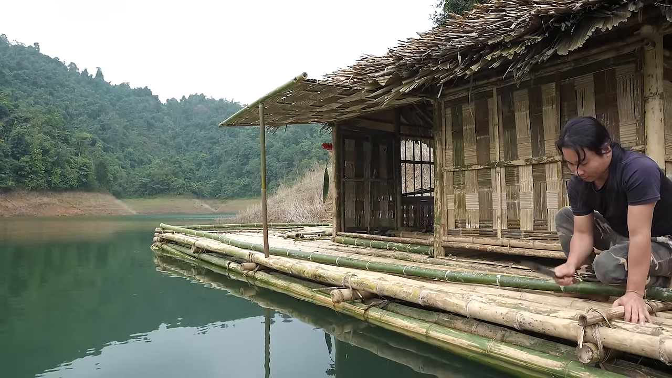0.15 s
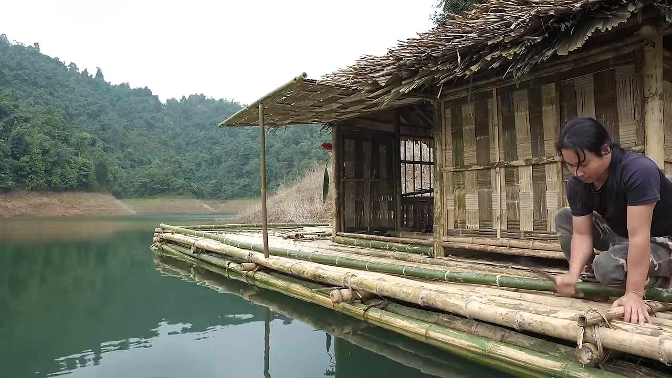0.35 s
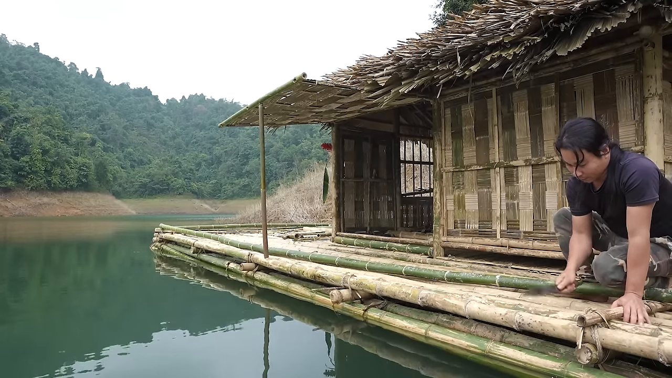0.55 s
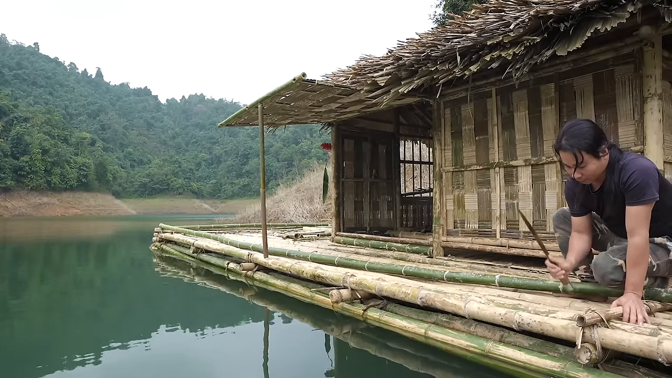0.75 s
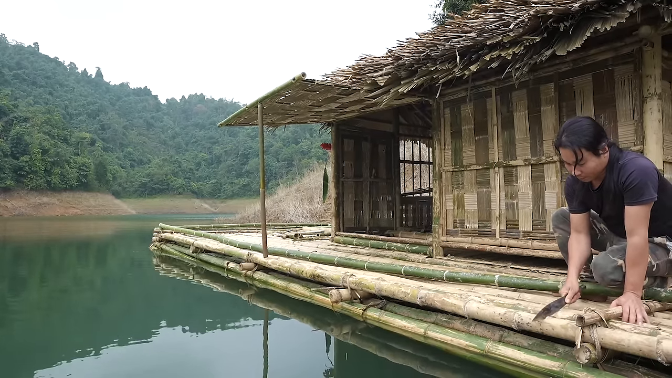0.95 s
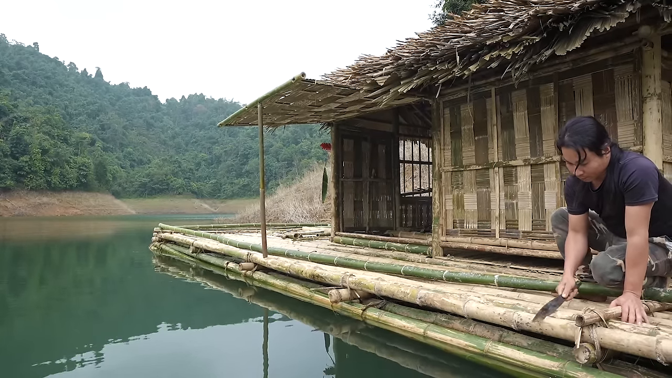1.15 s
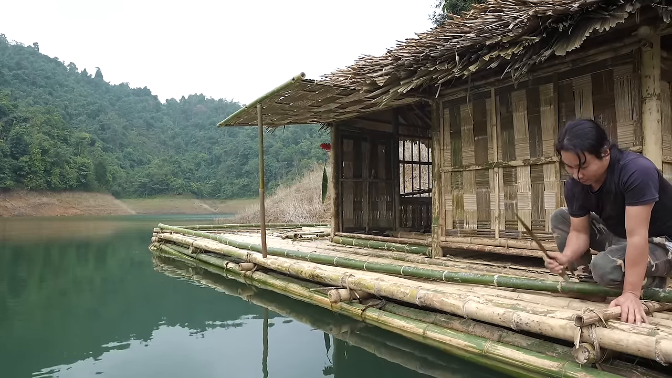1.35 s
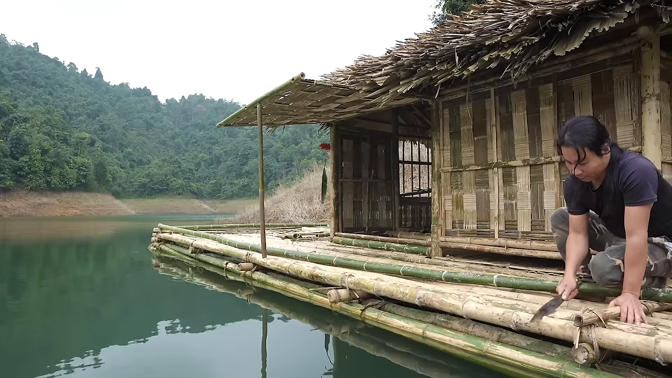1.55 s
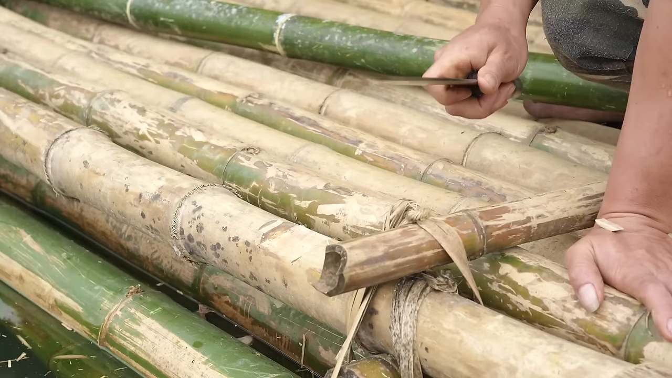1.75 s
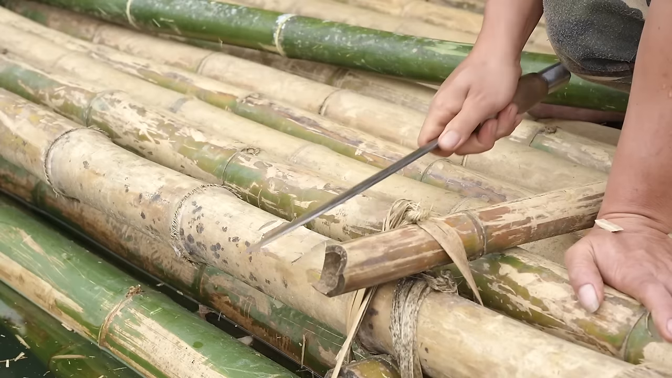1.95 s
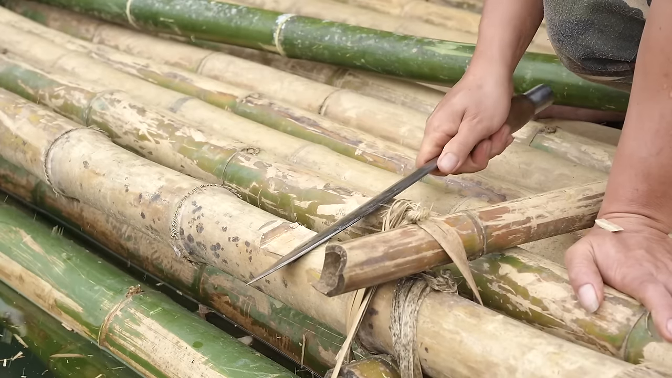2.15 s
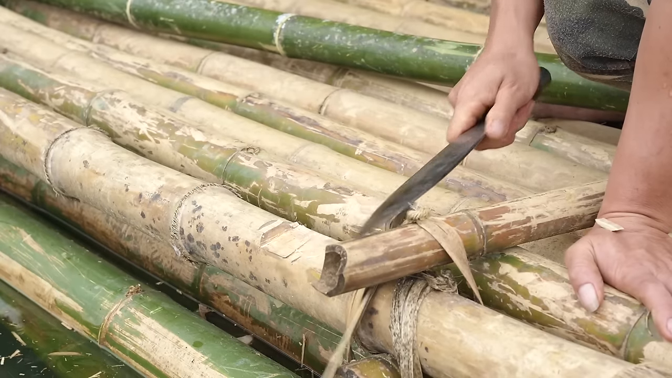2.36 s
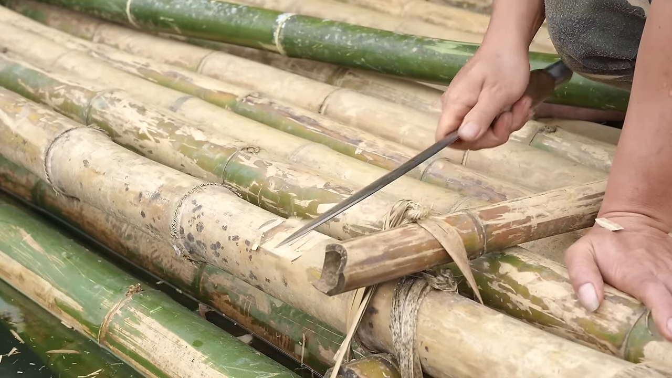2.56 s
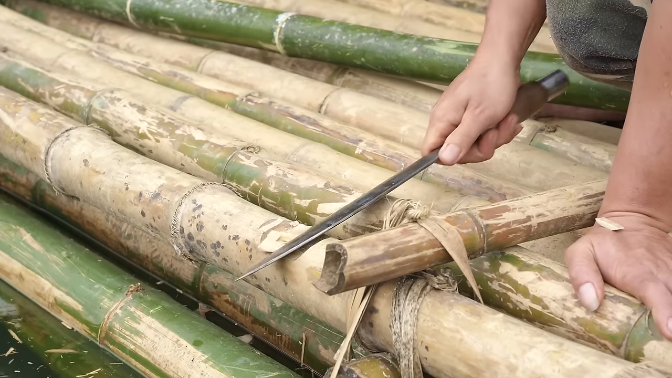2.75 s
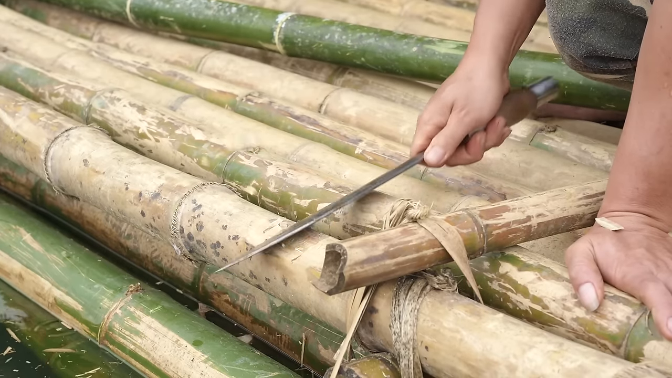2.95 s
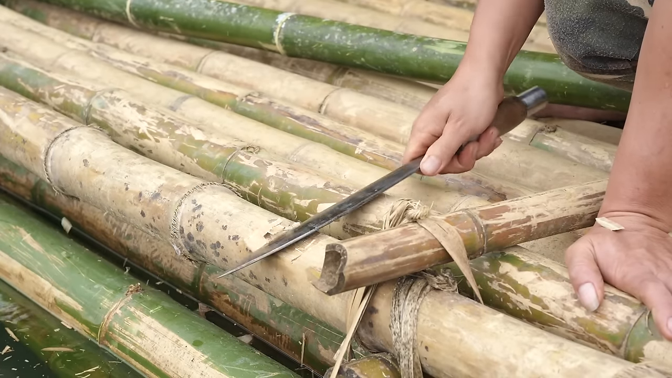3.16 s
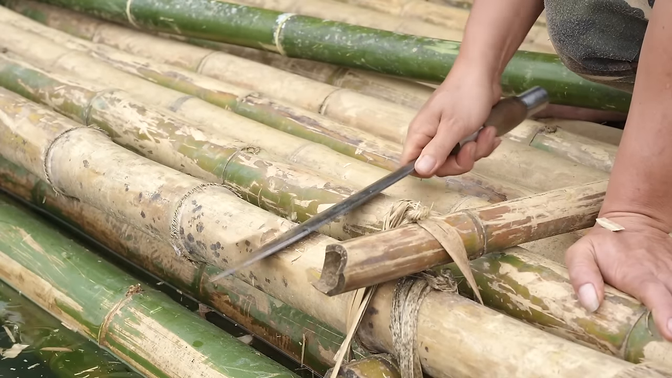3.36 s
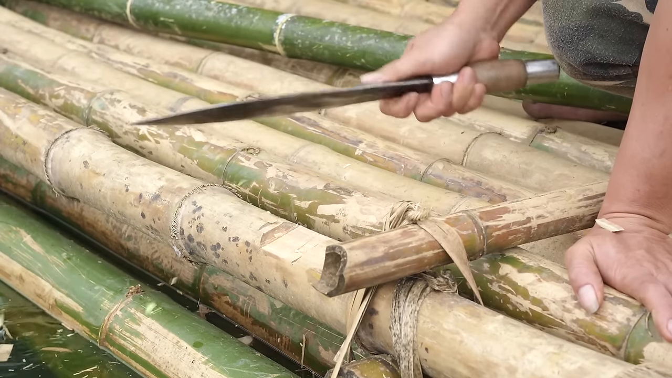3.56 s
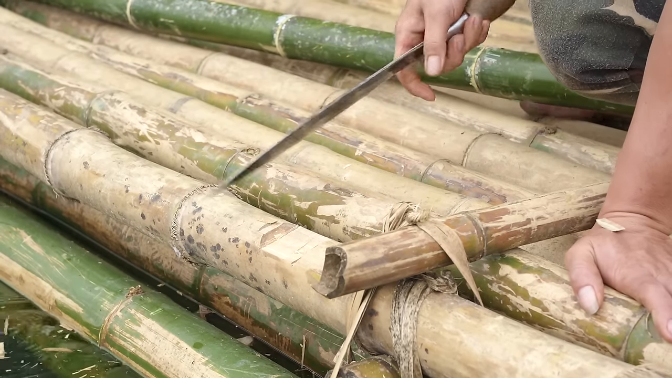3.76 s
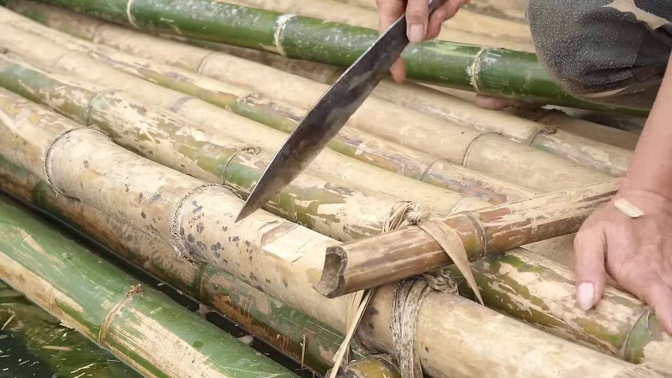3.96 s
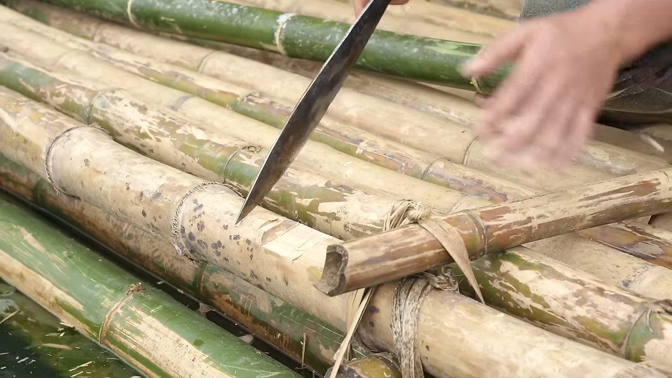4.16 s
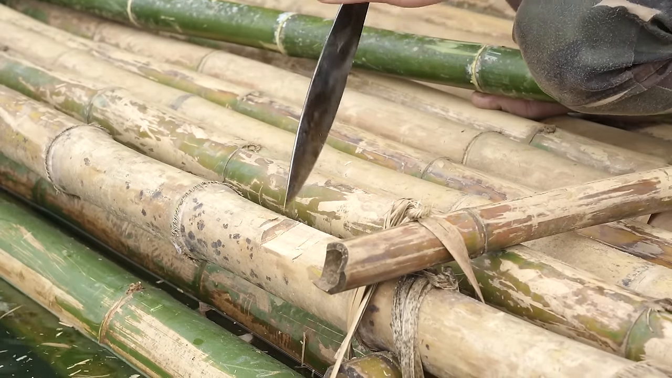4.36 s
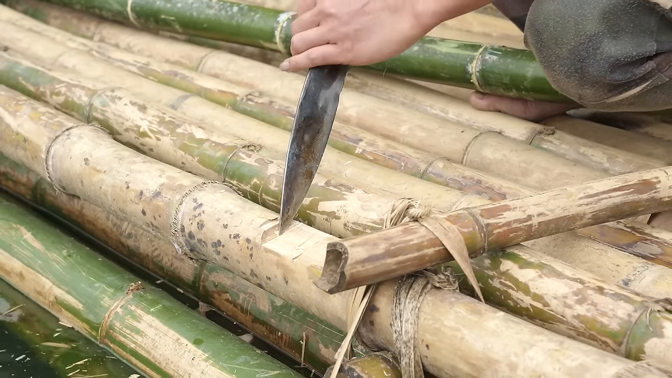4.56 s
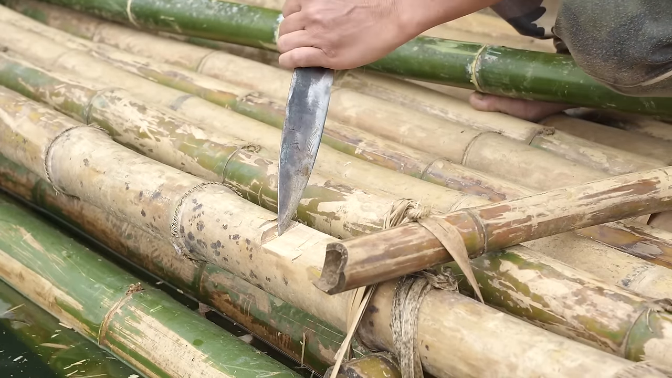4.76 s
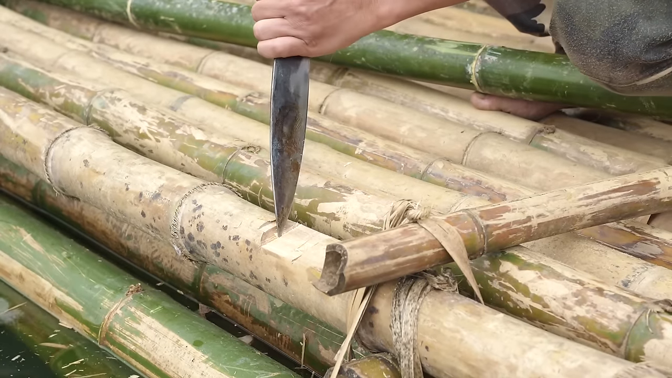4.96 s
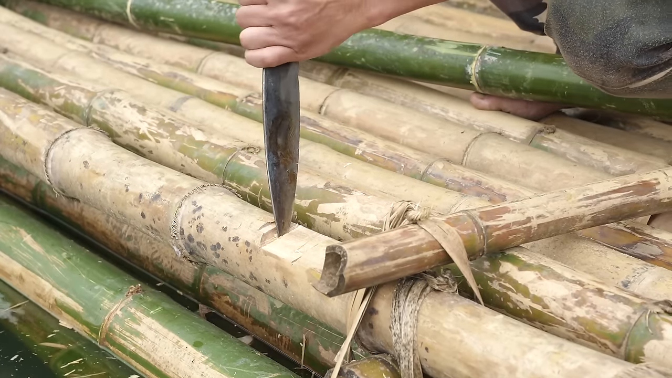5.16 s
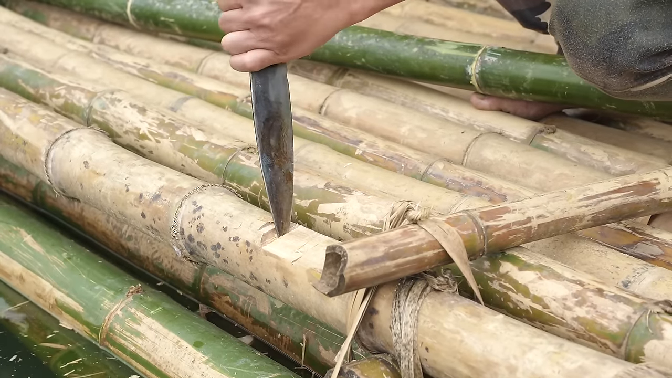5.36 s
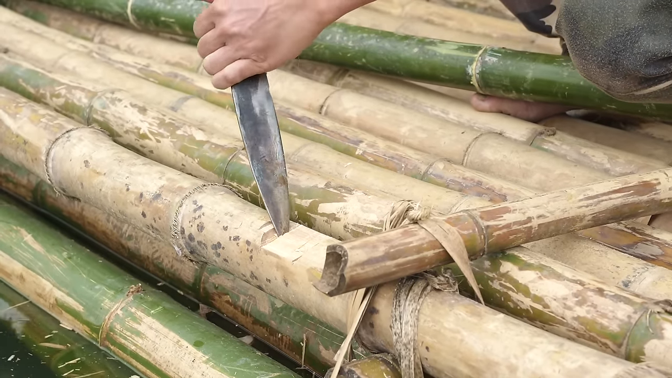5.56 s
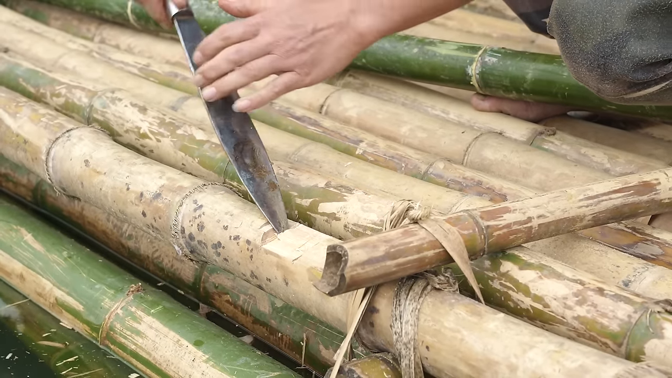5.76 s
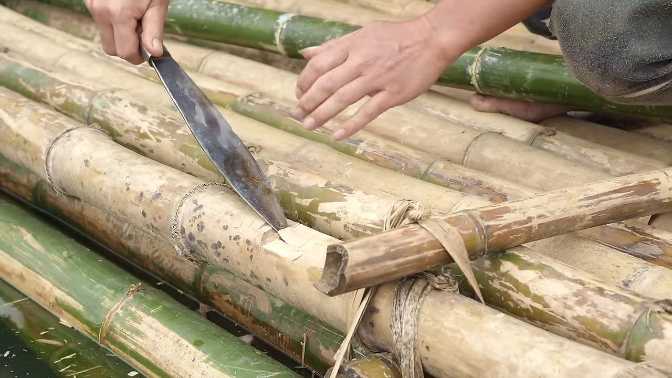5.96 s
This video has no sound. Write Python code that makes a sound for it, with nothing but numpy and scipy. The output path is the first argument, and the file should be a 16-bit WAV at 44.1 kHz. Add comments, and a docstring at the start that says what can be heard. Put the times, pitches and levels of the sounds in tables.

```python
"""Knife notching bamboo on a raft

A large knife cuts a notch in a bamboo pole lashed to a raft: five full swings and quick slanting cuts.
Each blow cracks the cane (noise tears through its wall modes) and thuds through the hollow deck poles
(modes and a blur of noise, low notes last). Then the knife tip is turned in the notch: coloured noise
makes small ticks, scrapes, slides and rustles, short sines ring the steel; faint air, wind and tails around.
"""
import sys
import numpy as np
from scipy import signal
from scipy.fft import rfft, irfft
from scipy.io import wavfile
from scipy.ndimage import uniform_filter1d

SR = 44100
rng = np.random.default_rng(int(sys.argv[2]) if len(sys.argv) > 2 else 0)


def wav_record(signal):
    """Record a signal, one row per channel, as 16-bit PCM in the file named by sys.argv[1]."""
    frames = np.transpose(np.atleast_2d(signal))
    bounded = np.clip(frames, -1, 1)
    # unit amplitude maps onto the largest positive 16-bit level
    quanta = np.round(bounded * 32767).astype(np.int16)
    wavfile.write(sys.argv[1], SR, quanta)


N = 265041
T = np.arange(SR // 2) / SR  # time axis of one event, s

# slanting cuts: t/s, crack/dB, hollow knock/dB, splinter fizz/dB, deck thud/dB, # bite decay/s, hollow
# pitch/Hz, deck's favoured note/Hz
CUTS = [(1.9256, -15.5, -18.5, -23.5, -16, 0.0024, 798, 760), (2.2045, -18, -18, -24, -16, 0.004, 966, 280),
        (2.4376, -18, -26, -17.5, -16.5, 0.0079, 1027, 440),
        (2.4822, -15.5, -23.5, -18.5, -15.5, 0.0022, 942, 660),
        (2.7228, -13.5, -23, -21, -15.5, 0.012, 798, 292),
        (2.959, -17.5, -19, -30.5, -25, .0013, 1064, 456),
        (2.9666, -17.5, -22, -22, -12.5, 0.0069, 785, 483),
        (3.1756, -14, -23.5, -20.5, -15.5, 0.014, 1290, 275),
        (3.4, -14, -27.5, -23.5, -21, 0.004, 1330, 640), (3.432, -15, -24, -25, -15.5, 0.002, 773, 520),
        (3.8864, -23.5, -17.5, -26.5, -19, 0.0066, 693, 438),
        (3.938, -35, -29.5, -48.5, -37, 0.0053, 623, 445)]
# colour of small snaps: f/Hz, level/(dB per Hz)
TICK = [(200, -18.5), (1200, -15.5), (2600, -5), (3600, -2.5), (5000, -8), (7500, -5.5), (10000, -5.5),
        (14000, -9.5), (16000, -18)]


def amp(db):
    """Amplitude ratio from decibels."""
    return 10 ** (np.asarray(db) / 20)


def evened(x):
    """Scales to unit RMS."""
    return x / np.sqrt(np.mean(x ** 2) + 1e-20)


def sized(x):
    """Scales to the energy of 10 ms at full level."""
    return x / np.sqrt(np.sum(x ** 2) / (SR / 100) + 1e-20)


def dying(t, t60):
    """Exponential decay from t = 0, 60 dB down after t60 seconds; silent before."""
    return np.exp(-np.log(1000) * np.maximum(t, 0) / t60) * (t >= 0)


def read(points, hz):
    """Interpolates a spectrum in dB over log frequency."""
    f, db = np.transpose(points)
    return np.interp(np.log(hz + 1), np.log(f + 1), db)


def add(mix, s, sound):
    """Adds a sound to the mix at s seconds."""
    part = mix[max(round(s * SR), 0):][:len(sound)]
    part += sound[:len(part)]


def colour(x, points, size=4096):
    """Causal minimum-phase filter with the given spectrum."""
    log_gain = np.log(amp(read(points, abs(np.fft.fftfreq(size, 1 / SR)))))
    taps = np.fft.ifft(np.exp(np.conj(signal.hilbert(log_gain)))).real
    return signal.oaconvolve(x, taps[:size // 2])[:len(x)]


def fibres(decay_s, grain_db):
    """Fibres snapping: tiny clicks of uneven size that die away."""
    clicks = rng.standard_normal(len(T)) * amp(grain_db * rng.standard_normal(len(T)))
    return clicks * np.exp(-T / max(decay_s, 1e-4))


def ring(modes, t60):
    """Modes struck together, neighbours in opposite sign."""
    tones = sum((-1) ** k * amp(db) * np.sin(2 * np.pi * hz * T) for k, (hz, db) in enumerate(modes))
    return tones * dying(T, t60)


def outdoors():
    """Faint air over the lake and a low rumble of wind in small gusts."""
    # air colour: f/Hz, level/(dB per Hz)
    air_colour = [(15, -44), (25, -2.5), (64, -15.5), (200, -17.5), (309, -14), (451, -14.5), (714, -18.5),
                  (1130, -21.5), (1370, -20), (1480, -24.5), (2760, -25.5), (3620, -22.5), (5430, -34.5),
                  (14800, -44.5), (16000, -52)]
    # wind level, dropping and picking up again: t/s, level/dB
    wind_level = [(0, -55), (1.0, -50), (1.7, -62), (2.4, -52.5), (4.6, -69.5), (5.4, -57.5), (6.0, -58.5)]
    wind_colour = [(12, -6.0), (28, -1.5), (45, -12.5), (62, 2.0), (80, -8.0), (100, -7.5),
                   (200, -21.5), (900, -58.0)]
    gust_db, gust_hz = -1, 3
    hz, t = np.fft.rfftfreq(N, 1 / SR), np.arange(N) / SR

    def noise(gain):
        return evened(irfft(rfft(rng.standard_normal(N)) * gain, N))

    air = noise(amp(read(air_colour, hz)))
    wind = noise(amp(read(wind_colour, hz)))
    gusts = noise(np.exp(-(hz / gust_hz) ** 2))
    wind_db = np.interp(t, *np.transpose(wind_level)) + gust_db * gusts
    return amp(-62.5) * air + amp(wind_db) * wind


def echo(x, spectrum, t60, delay_s):
    """A faint, diffuse tail: convolution with coloured, decaying noise."""
    t = np.arange(SR) / SR
    tail = colour(rng.standard_normal(SR) * dying(t - delay_s, t60), spectrum)
    return signal.fftconvolve(x, tail / np.linalg.norm(tail))[:N]


def plop():
    """A chip plops into the lake: a small bubble whose pitch rises as it nears the surface."""
    # the bubble: t/s, level/dB, f/Hz, rise/(Hz per s)
    s, db, hz, rise = (3.103, -46.5, 950, 40000)
    out = np.zeros(N)
    tone = np.sin(2 * np.pi * (hz + rise * T / 2) * T)
    envelope = np.minimum(T / 0.009, 1) ** 2 * dying(np.maximum(T - .008, 0), t60=.015)
    add(out, s, amp(db) * sized(tone * envelope))
    return out


def rubbing(strokes, spectrum, attack_s, press_db, release_t60, clump_db, catches_per_s, catch_db):
    """Friction sets in, grows as the pressure builds and lets go; clumps of hiss and tiny catches."""
    level = np.zeros(N)
    for s, length_s, db in strokes:
        pressure = amp(press_db * np.minimum(T / length_s - 1, 0))
        release = dying(np.maximum(T - length_s, 0), release_t60)
        add(level, s, amp(db) * np.minimum(T / attack_s, 1) * pressure * release)
    clumps = amp(clump_db * evened(uniform_filter1d(rng.standard_normal(N), 70)))
    catches = (rng.random(N) < catches_per_s / SR) * rng.standard_normal(N)
    grain = evened(rng.standard_normal(N) * clumps) + amp(catch_db) * evened(catches)
    return level * evened(colour(grain, spectrum))


def singing(x, hz, width_hz, db):
    """Whatever the tip touches also rings the blade's strongest mode."""
    return x + amp(db) * signal.lfilter(*signal.iirpeak(hz, hz / width_hz, SR), x)


def bumps():
    """A soft push wakes only the lowest modes of the poles, which beat against each other."""
    # bumps of the knife's tip and of weight shifting on the poles: t/s, level/dB, f/Hz, tap/dB
    pushes = [(2.377, -33.5, 285, -35.5), (4.2397, -23, 276.8, -29.5), (4.551, -40, 271, -53.5),
              (5.401, -38.5, 285, -57.5), (5.513, -47.5, 286, -67.5), (5.584, -50.5, 266, -75),
              (5.921, -62, 318, -43.5)]
    # tap colour: f/Hz, level/(dB per Hz)
    tap_colour = [(100, -8.5), (480, 3), (1000, -0.5), (2400, 2), (4000, -10.5), (16000, -39)]
    blur_colour = [(80, -28), (170, -10.5), (280, -3.5), (500, -7), (900, -10.5), (3000, -35.0), (12000, -57)]
    out = np.zeros(N)
    for s, db, hz, tap_db in pushes:
        modes = sized(ring([(hz * .88, -7), (hz, 0), (hz * 1.14, -3)], t60=0.2))
        blur = sized(colour(rng.standard_normal(len(T)) * dying(T, t60=0.29), blur_colour))
        low = sized((modes + amp(-6.5) * blur) * np.minimum(T / 0.0078, 1))
        tap = sized(colour(fibres(.008, grain_db=4.5), tap_colour))
        add(out, s, amp(db) * low + amp(tap_db) * tap)
    return out


def ticks():
    """Small snaps, each with a brief shiver of the cane and a ring of the blade."""
    # chips snapping and the tip catching in fibres: t/s, level/dB, decay/s, brightness at 13 kHz/dB
    snaps = [(1.247, -41.5, 0.013, -24.5), (2.376, -39, 0.013, -5), (2.382, -36, 0.0055, -14),
             (2.432, -35, 0.017, -2), (2.57, -43.5, .0047, 7), (2.5895, -39, 0.0013, 6.5),
             (2.843, -46, 0.00242, 4), (2.97, -30.5, .0026, 1), (3.259, -46, 0.002, -8),
             (3.534, -33.5, .0028, 9.5), (4.334, -39.5, 0.0055, -14), (4.378, -33.5, 0.0069, -3),
             (4.55, -33, .0028, 0), (5.141, -40, 0.001, 4), (5.7528, -40, .001, 11),
             (5.7777, -32.5, 0.00046, 12.5), (5.8875, -51, .0015, 5), (5.9067, -43.5, 0.00081, 3.5),
             (5.914, -39.5, 0.00084, 9), (5.9325, -35, 0.0026, 2), (5.9603, -35, 0.0014, 2)]
    out = np.zeros(N)
    for s, db, decay_s, bright_db in snaps:
        snap = colour(sized(fibres(decay_s, grain_db=1)), [(6500, 0.02), (13000, bright_db)])
        shiver = colour(sized(fibres(0.0071, grain_db=8.5)), [(4000, 0), (7000, bright_db - 8.0)])
        tick = singing(colour(snap + shiver, TICK), hz=3484, width_hz=170, db=0.5)
        add(out, s, amp(db) * sized(tick))
    return out


def blade():
    """Steel rings thinly when it springs free, until wood or hand stops it; one ping from the tip."""
    # rings: t/s, level/dB, time free/s
    rings = [(0.0197, -44.5, .15), (2.9665, -47.5, .03), (3.26, -43, .13), (3.3985, -45, .03),
             (3.505, -41, .14)]
    # blade modes: f/Hz, level/dB, t60/s
    steel = [(3450, 4.5, .06), (5400, -6.5, .07), (7200, -12, 0.053), (11600, -2.5, 0.21),
             (13437, -17.5, .08), (15143, -10.5, .08)]
    # tip flicking off the rim of the notch: t/s, level/dB
    flick_s, flick_db = (3.537, -40)
    # modes of the flicked tip: f/Hz, level/dB
    flick_modes = [(5669, 0), (15140, 0)]
    stopped_t60_s = .04
    out = np.zeros(N)
    tone = sized(sum(amp(db) * np.sin(2 * np.pi * hz * T) * dying(T, t60) for hz, db, t60 in steel))
    for s, db, free_s in rings:
        add(out, s, amp(db) * tone * dying(np.maximum(T - free_s, 0), stopped_t60_s))
    add(out, flick_s, amp(flick_db) * sized(ring(flick_modes, t60=0.038)))
    return out


def crumbs(db, spread_db, first_s, within_s, count):
    """As the edge is pulled out of each cut, a few splinters snap off at random."""
    out = np.zeros(N)
    for s, _, _, fizz_db, *_ in CUTS:
        for when, size in rng.random((count, 2)):
            snap = sized(colour(fibres(.002, grain_db=9), TICK))
            add(out, s + first_s + when * within_s, amp(fizz_db + db - spread_db * size) * snap)
    return out


def rattle(swell_s, t60):
    """Lashed poles and slats chatter against each other as the shock reaches them."""
    # rattle colour: f/Hz, level/(dB per Hz)
    rattle_colour = [(200, -33.5), (700, -2), (1250, 9), (1550, 2.5), (2300, 2), (2850, 0), (3500, 0.5),
                     (4600, -9.5), (6000, -19), (10000, -25), (16000, -31.5)]
    chatter = rng.standard_normal(len(T)) * amp(9.9 * rng.standard_normal(len(T)))
    envelope = np.minimum(.5 + .5 * T / swell_s, 1) * dying(np.maximum(T - swell_s, 0), t60)
    return sized(colour(chatter * envelope, rattle_colour))


def spreading(hz, t, lag_s, t60):
    """Bending waves travel slower when low: low notes swell later and last longer (lag, t60 at 300 Hz)."""
    arrival_s = lag_s * (300 / hz) ** .5
    swell = 1 - np.exp(-(np.maximum(t, 0) / arrival_s) ** 3)
    return swell * dying(np.maximum(t - arrival_s, 0), t60 * (300 / hz) ** 0.53)


def thud(deck, favoured_hz, lag_s, t60, blur, favour_db):
    """The deck's strong modes amid a blur of weaker ones; the place of the blow favours one note."""
    # colour of the blur: f/Hz, level/(dB per Hz)
    thud_colour = [(40, -33), (90, -22.5), (140, -10), (175, -12), (290, -2), (380, -8.5), (540, -2),
                   (780, -4), (1100, -13), (2000, -27.5), (5000, -45)]

    def favour(hz):
        return amp(favour_db * np.exp(-(np.log(hz / favoured_hz) / 0.13) ** 2))

    hz, db = np.transpose(deck)[:, :, None]
    gains = amp(db + 1.2 * rng.standard_normal(db.shape)) * favour(hz)
    tones = np.sin(2 * np.pi * hz * (T - lag_s * (300 / hz) ** .5))
    modes = (gains * tones * spreading(hz, T, lag_s, t60)).sum(0)
    f, t, z = signal.stft(rng.standard_normal(len(T)), SR, nperseg=256)
    f = np.maximum(f, 120)[:, None]
    wash = signal.istft(z * favour(f) * spreading(f, t, lag_s, t60), SR, nperseg=256)[1][:len(T)]
    return sized(sized(modes) + blur * sized(colour(wash, thud_colour)))


def knock(hz, t60):
    """The air and walls of the hollow cane take a cycle to start ringing."""
    # hollow modes: multiple of the pitch, level/dB
    hollow = [(0.619, 0), (0.998, 1.5), (1.18, -1), (1.421, -9.5)]
    return sized(ring([(hz * k, db) for k, db in hollow], t60) * np.minimum(T * hz, 1))


def crack(wall, bite_s, t60, tear, split):
    """The edge lands, tears fibres, and the chip splits off a moment later; all ring the cane's wall."""
    tearing = fibres(bite_s, grain_db=2.5)
    push = tear * tearing / np.linalg.norm(tearing)
    push[0] += 1
    push[round(.0034 * SR)] += split
    ringing = signal.fftconvolve(push, ring(wall, t60))[:len(T)]
    return sized(colour(ringing, [(500, -8.5), (1200, -9.5), (1900, 0.5)]))


def blows(rows, wall, deck, wall_t60, tear, split, peel_db, lag_s, deck_t60, blur, favour_db, boom_db,
          rattle_db, swell_s, rattle_t60):
    """Crack, knock and splinters at the edge, then the raft; its rattle follows the force of the crack."""
    # splinter colour: f/Hz, level/(dB per Hz)
    fizz_colour = [(300, -25), (1500, -28), (3500, 14.5), (5500, 5.5), (7500, 1), (10000, -4), (12000, -4),
                   (16000, -15)]
    boom_hz = 144.1  # the raft's lowest note
    # the chip peels away just after the bite; the longer the bite, the more fibres tear
    peel_delay_s, peel_decay_s, full_bite_s = .008, .008, .006
    out = np.zeros(N)
    for s, crack_db, knock_db, fizz_db, deck_db, bite_s, hollow_hz, favoured_hz in rows:
        edge = amp(crack_db) * crack(wall, bite_s, wall_t60, tear, split)
        edge += amp(knock_db) * knock(hollow_hz, t60=0.037)
        edge += amp(fizz_db) * sized(colour(fibres(0.57 * bite_s, grain_db=6.0), fizz_colour))
        boom = sized(np.sin(2 * np.pi * boom_hz * T) * spreading(boom_hz, T, 2.0 * lag_s, t60=0.28))
        raft = thud(deck, favoured_hz, lag_s, deck_t60, blur, favour_db) + amp(boom_db) * boom
        chatter = amp(crack_db + rattle_db) * rattle(swell_s, rattle_t60)
        add(out, s, edge + amp(deck_db) * raft + chatter)
        peel = sized(colour(fibres(peel_decay_s, grain_db=4.5), TICK))
        add(out, s + peel_delay_s, amp(fizz_db + peel_db) * min(bite_s / full_bite_s, 1) * peel)
    return out


def scene():
    """Blows, small handling sounds and their tails in the open air."""
    # full swings: columns as in CUTS
    swing_rows = [(.0226, -12, -23.5, -20.5, -9.5, 0.0065, 686, 700),
                  (.4572, -11, -27.5, -24, -10.5, 0.0043, 640, 550),
                  (.9014, -9.5, -27.5, -22.5, -11, .0037, 673, 520),
                  (1.5654, -11.5, -42, -23.5, -15, 0.0051, 604, 447),
                  (1.9945, -18.5, -39.5, -26, -19.5, 0.0065, 620, 630)]
    # wall modes of the struck cane under swings and cuts: f/Hz, level/dB
    swing_wall = [(1749, 5), (2153, 6), (2470, 6), (2672, -2), (3046, -6.5), (3254, 0), (3501, 1.5),
                  (3736, 0), (4408, -13.5)]
    cut_wall = [(1733, -5), (1946, -6.5), (2156, 0.5), (2635, 0.5), (3011, -2.5), (3329, 2), (3609, 1),
                (3816, -5), (4718, -16.5)]
    # modes of the deck poles at the two places: f/Hz, level/dB
    swing_deck = [(269, -9), (298, -10.5), (333, -4), (376, -13.5), (414, -8.5), (457, -5), (506, -3.5),
                  (549, -3), (586, -14.5), (621, -15), (675, -1), (707, -5.5), (767, -9.5), (845, -4.5),
                  (1243, -22.5), (1337, -8), (1741, -11.5), (1795, -9)]
    cut_deck = [(255, -4), (304, 6.5), (382, -2), (419, 4.5), (460, 7.5), (511, -0.5), (597, -1),
                (624, -8.5), (654, 3), (699, -1.5), (764, 2), (823, 6), (901, 5), (987, -4.5),
                (1033, -19.5), (1138, -14), (1337, -16.5), (1375, -31)]
    # tip scraping in the notch: t/s, length/s, level/dB
    scrape_strokes = [(3.828, 0.033, -48.5), (4.03, .05, -54), (5.066, 0.01, -52), (5.108, .02, -60),
                      (5.129, 0.019, -34.5), (5.153, 0.017, -31), (5.745, 0.12, -57), (5.88, 0.12, -54.5)]
    # hand sliding on the knife: t/s, length/s, level/dB
    slide_strokes = [(3.52, 0.14, -57.5), (3.92, 0.16, -55), (4.16, 0.21, -54.5), (4.53, 0.26, -54.5)]
    # sleeve and trousers rustling as the arm lifts: t/s, length/s, level/dB
    rustle_strokes = [(1.37, 0.19, -55.5), (4.48, 0.07, -51), (4.95, 0.17, -61), (5.5, 0.071, -61.5)]
    # friction colours of tip, hand and cloth: f/Hz, level/(dB per Hz)
    scrape_colour = [(100, -16), (400, -6), (700, 1), (1050, -5.5), (1600, -1.5), (2100, -5.5), (2700, 0),
                     (3100, -4.5), (3600, 3.5), (5000, -7.5), (8000, -7), (12000, -15), (16000, -20)]
    slide_colour = [(100, -28), (700, 0.5), (2000, 6), (3800, 7), (5200, -3.5), (8000, -5), (12000, -7.5),
                    (16000, -19)]
    cloth_colour = [(200, -9.5), (1000, -4.5), (2000, -1), (3000, -4.5), (4000, -7.5), (6000, -24.5),
                    (16000, -30)]
    # tail colours of the long poles, and of the hut's wall and thatch from afar: f/Hz, level/(dB per Hz)
    pole_colour = [(60, -16), (140, 7.5), (300, 4), (550, -1.5), (900, -17), (2200, -16), (3700, -16.5),
                   (5500, -9), (15000, -39.5)]
    hut_colour = [(100, -13.5), (500, -7), (1000, -3), (2200, -8), (4000, -4), (5500, -4.5), (9000, -2),
                  (16000, -12.5)]

    scrape = rubbing(scrape_strokes, scrape_colour, attack_s=0.0042, press_db=5, release_t60=0.076,
                     clump_db=1.5, catches_per_s=280, catch_db=-5)
    slide = rubbing(slide_strokes, slide_colour, attack_s=0.053, press_db=4.5, release_t60=0.65,
                    clump_db=1.5, catches_per_s=800, catch_db=-11.5)
    rustle = rubbing(rustle_strokes, cloth_colour, attack_s=0.032, press_db=5.5, release_t60=0.16,
                     clump_db=2.0, catches_per_s=200, catch_db=-4)
    friction = singing(scrape, hz=3450, width_hz=200, db=1) + slide + rustle
    splinters = crumbs(db=-31.5, spread_db=14.5, first_s=0.01, within_s=.11, count=3)
    swings = blows(swing_rows, swing_wall, swing_deck, wall_t60=0.012, tear=0.45, split=0.058,
                   peel_db=-20.5, lag_s=.023, deck_t60=0.23, blur=1.0, favour_db=2.5, boom_db=-20,
                   rattle_db=-7.0, swell_s=0.025, rattle_t60=0.14)
    cuts = blows(CUTS, cut_wall, cut_deck, wall_t60=0.015, tear=0.78, split=0.84,
                 peel_db=-12.5, lag_s=0.01406, deck_t60=0.29, blur=0.93, favour_db=6.0, boom_db=-25.5,
                 rattle_db=-3.0, swell_s=0.0023, rattle_t60=0.13)
    near = swings + cuts + splinters + bumps() + ticks() + blade() + plop() + friction
    # the long poles keep every sound going; the swings are farther off, so the hut answers them too
    tails = amp(-30.0) * echo(near, pole_colour, t60=0.4, delay_s=0.029)
    tails += amp(-27) * echo(swings, hut_colour, t60=0.52, delay_s=0.029)
    return (near + tails + outdoors())[None]


def record(dry):
    """The loudest cracks overload softly; then the band limit."""
    ceiling, edge_hz = .85, 16100
    squashed = dry / (1 + (dry / ceiling) ** 4) ** (1 / 4)
    lowpass = signal.firwin(255, edge_hz, window=("kaiser", 9), fs=SR)
    return signal.oaconvolve(squashed, lowpass[None], "same")


dry = scene()
out = record(dry)
wav_record(out)
```